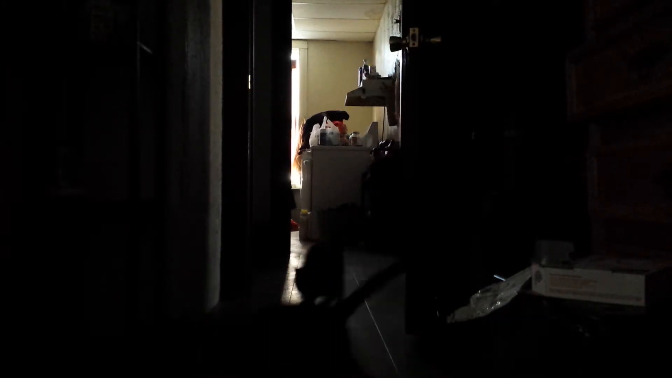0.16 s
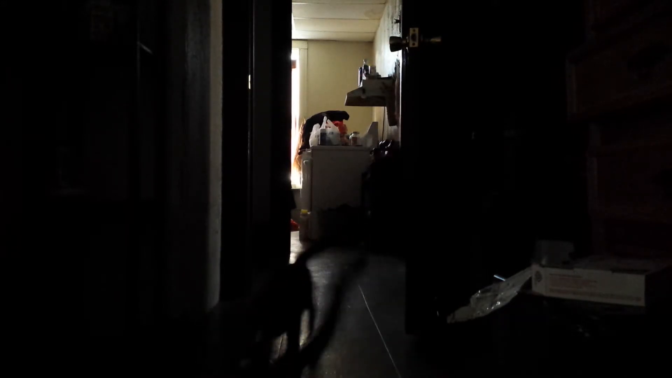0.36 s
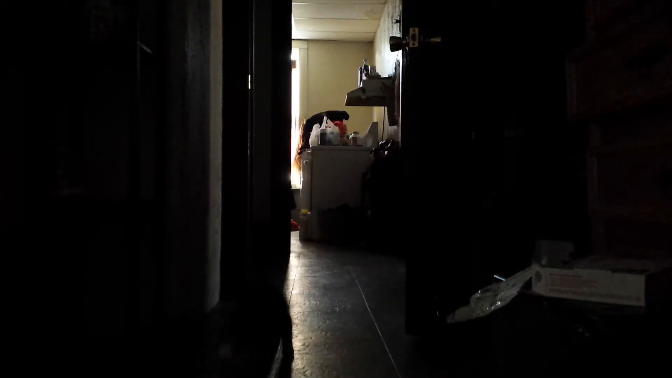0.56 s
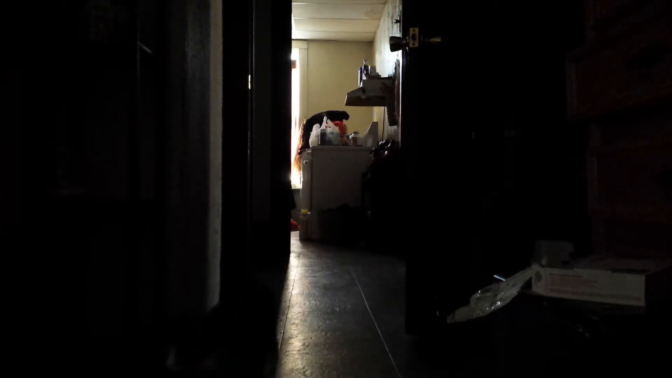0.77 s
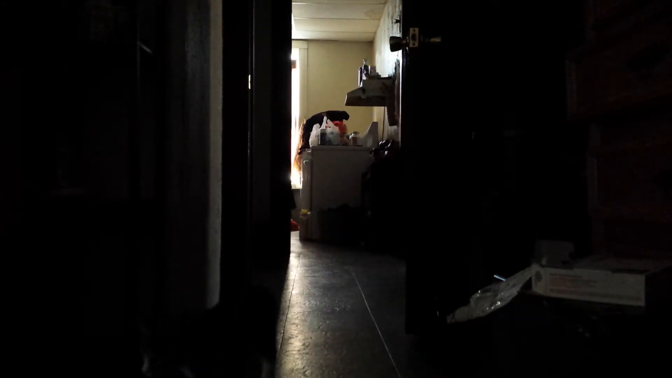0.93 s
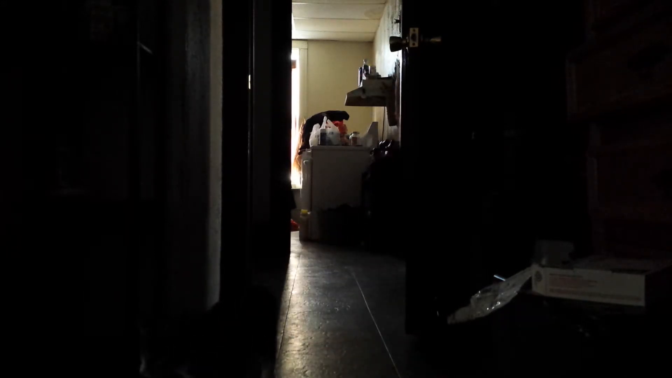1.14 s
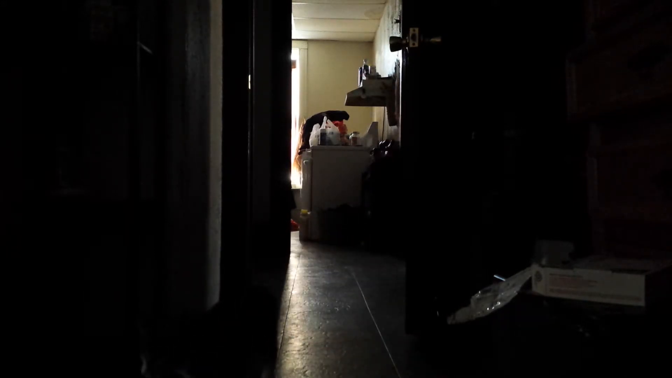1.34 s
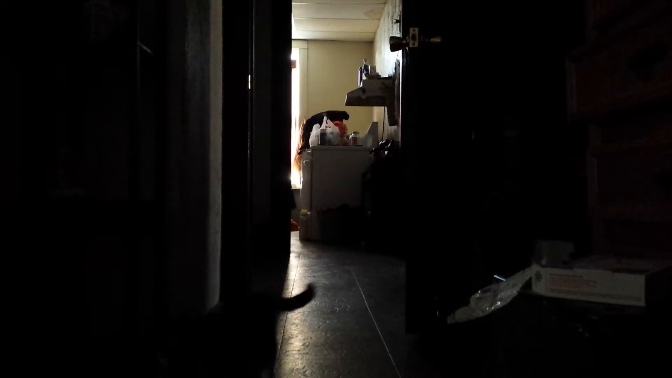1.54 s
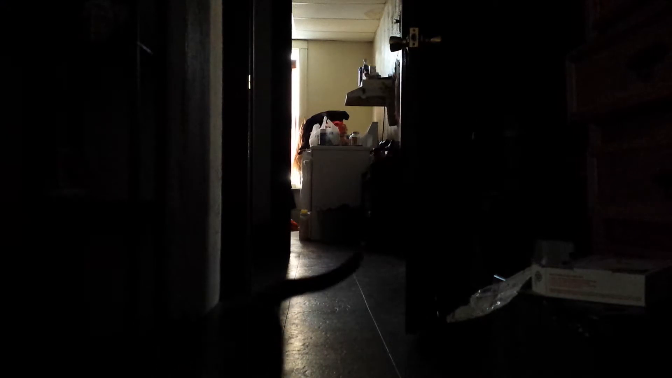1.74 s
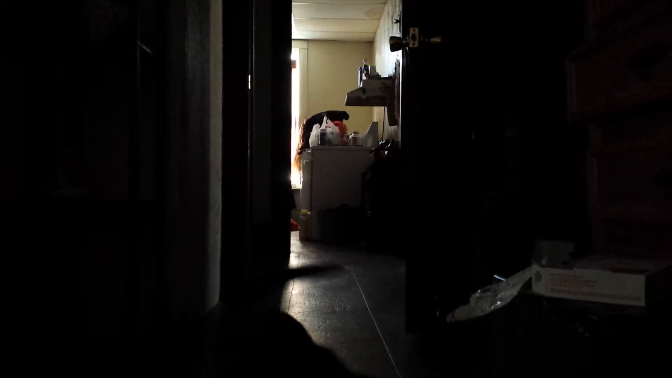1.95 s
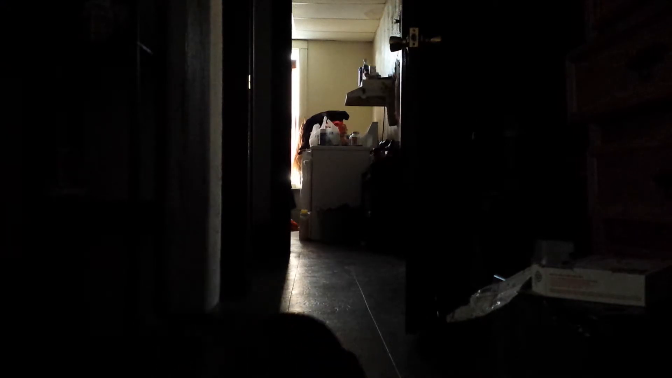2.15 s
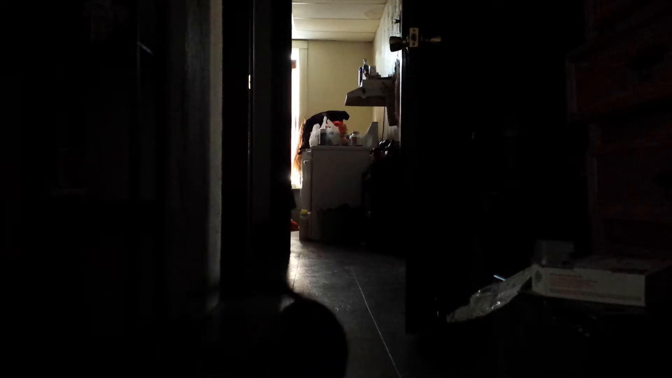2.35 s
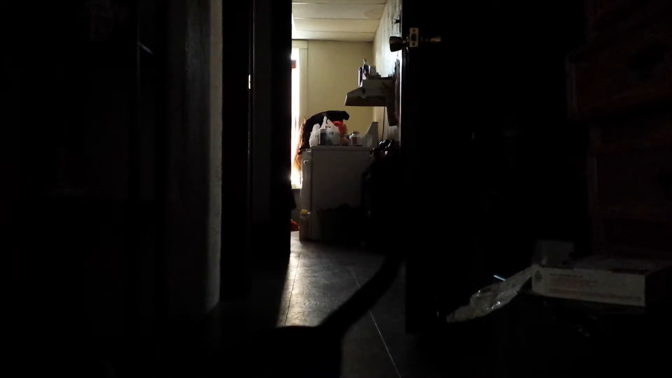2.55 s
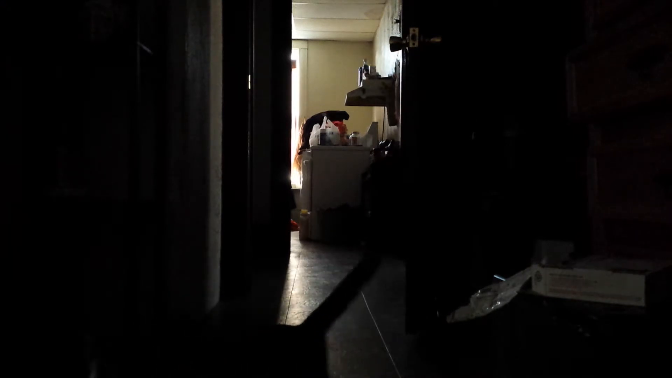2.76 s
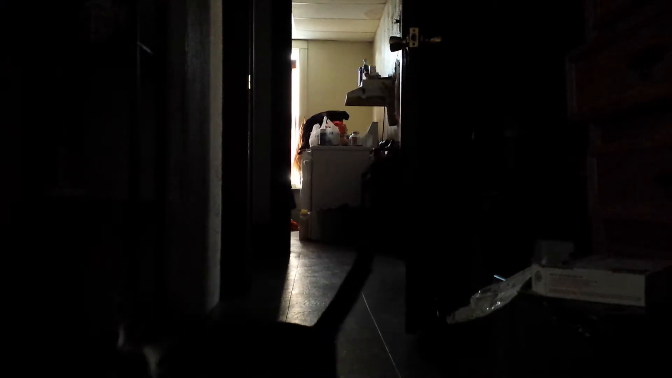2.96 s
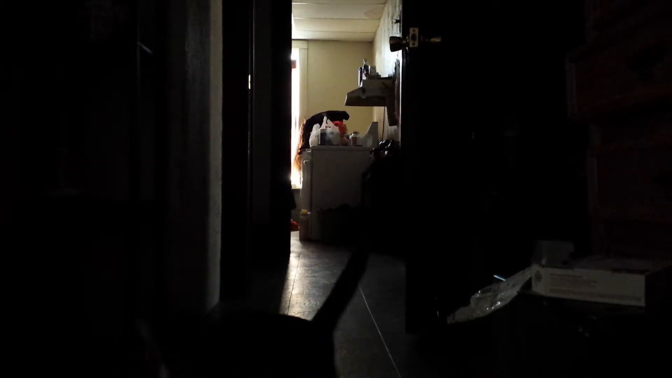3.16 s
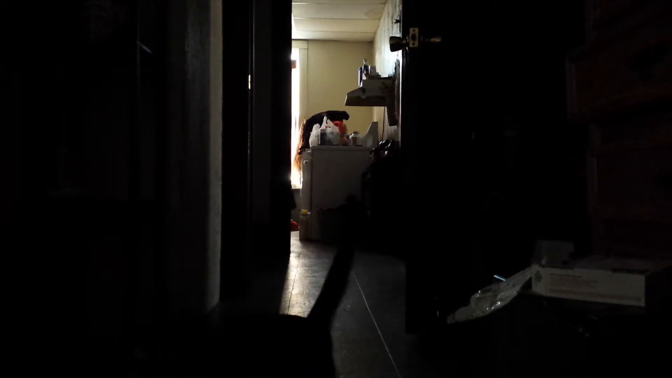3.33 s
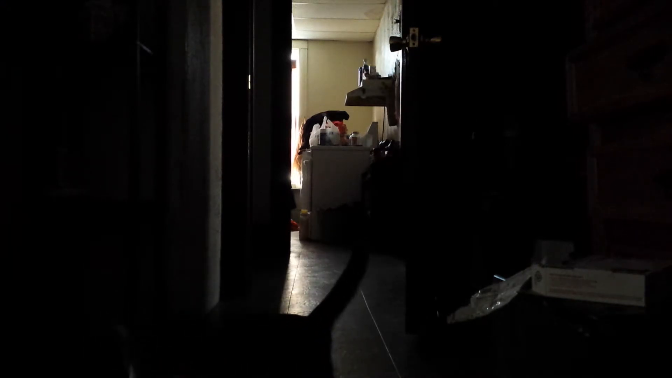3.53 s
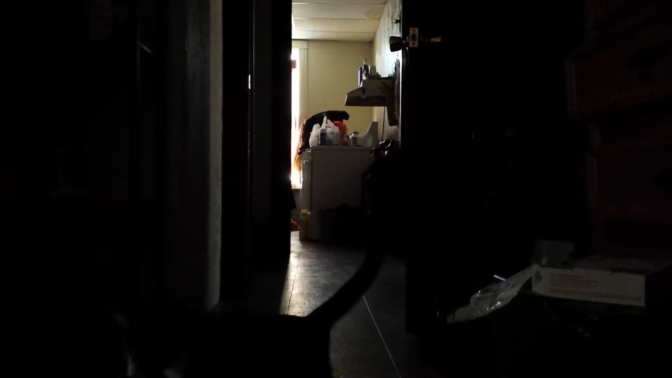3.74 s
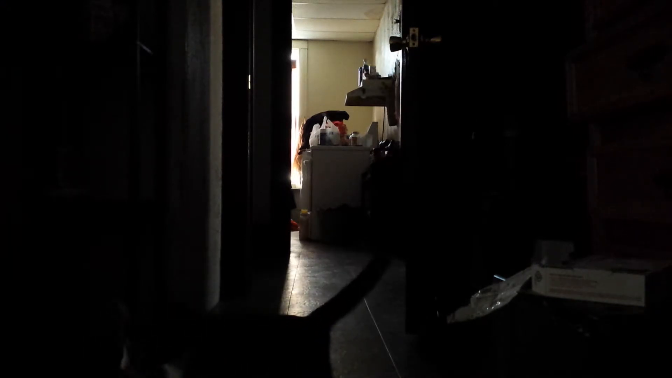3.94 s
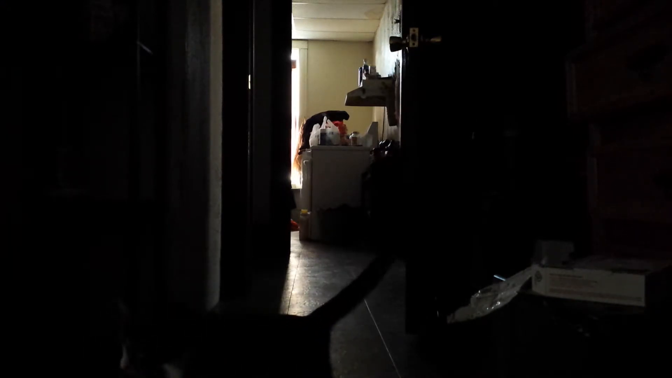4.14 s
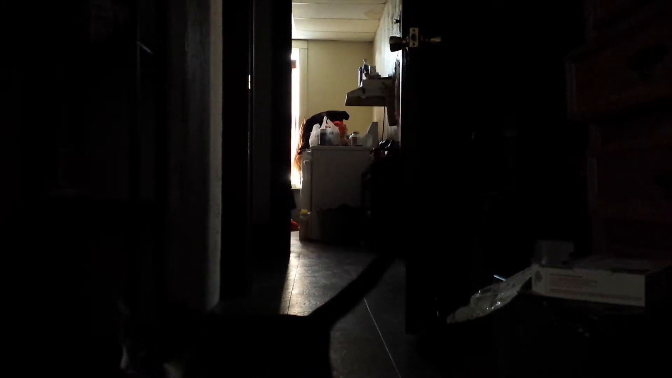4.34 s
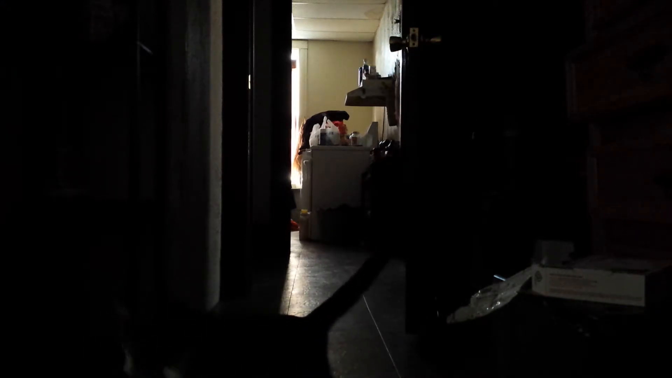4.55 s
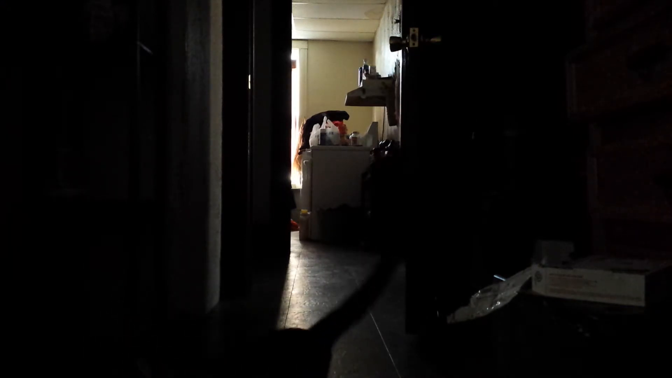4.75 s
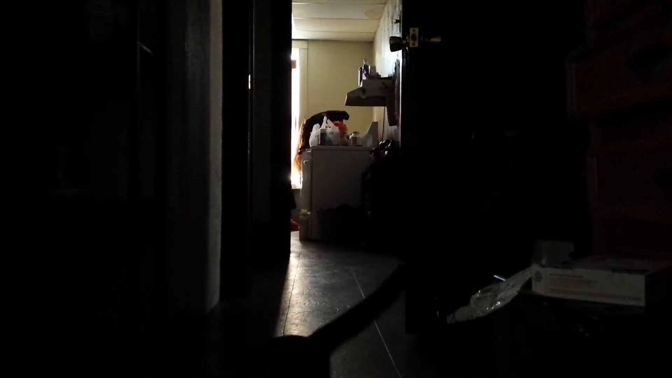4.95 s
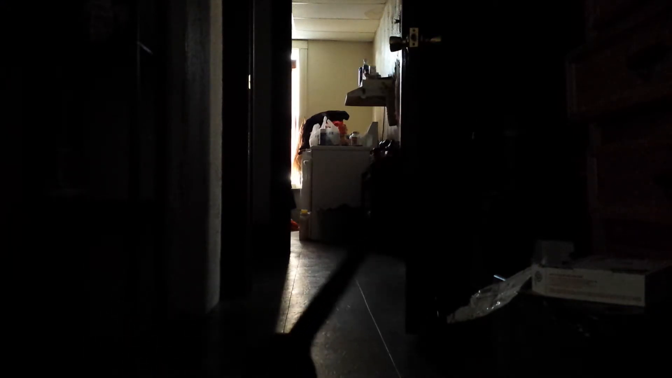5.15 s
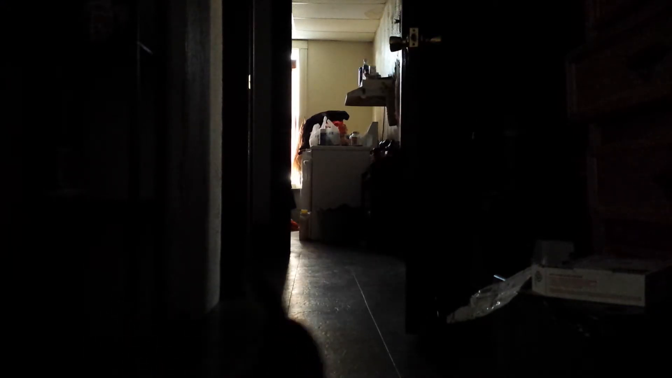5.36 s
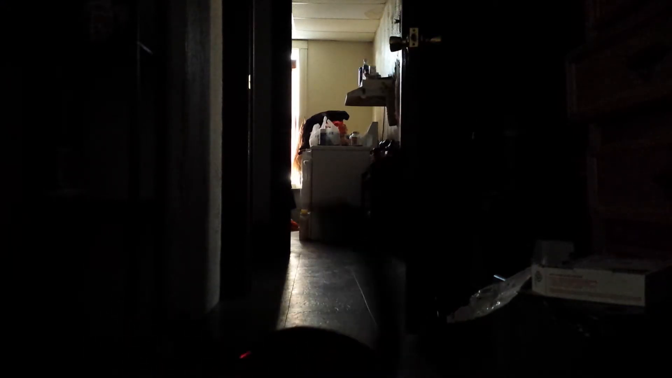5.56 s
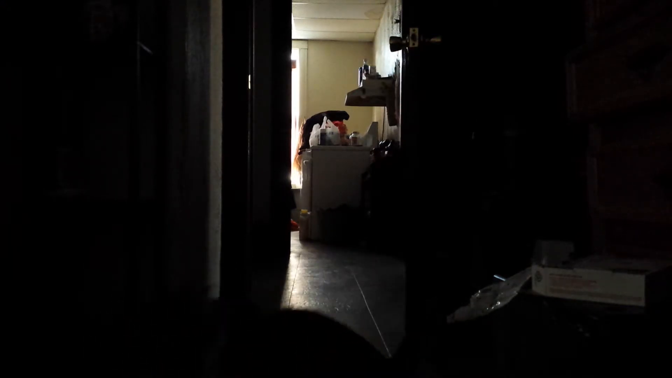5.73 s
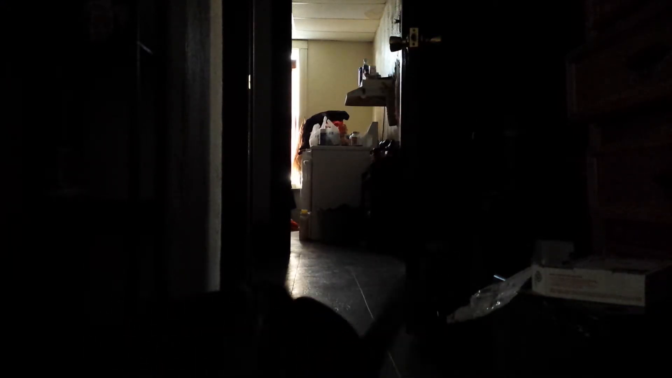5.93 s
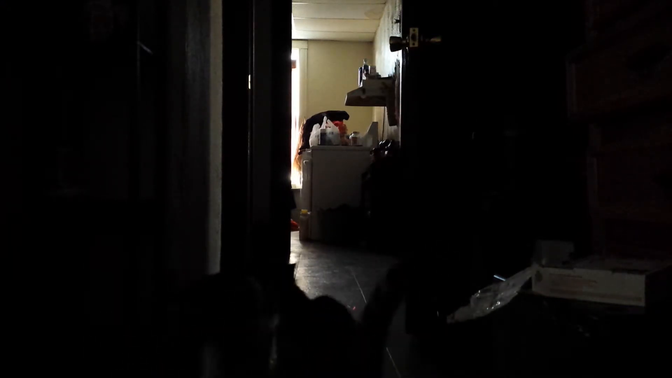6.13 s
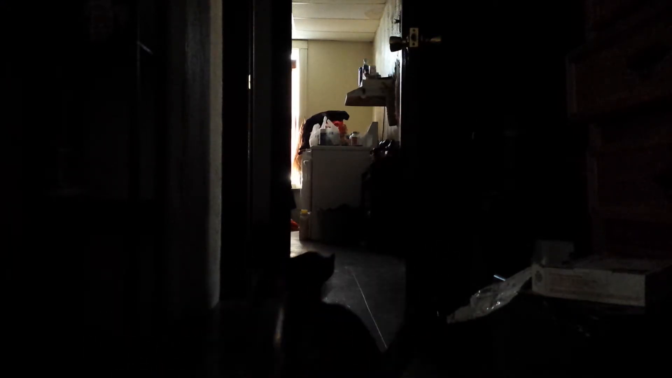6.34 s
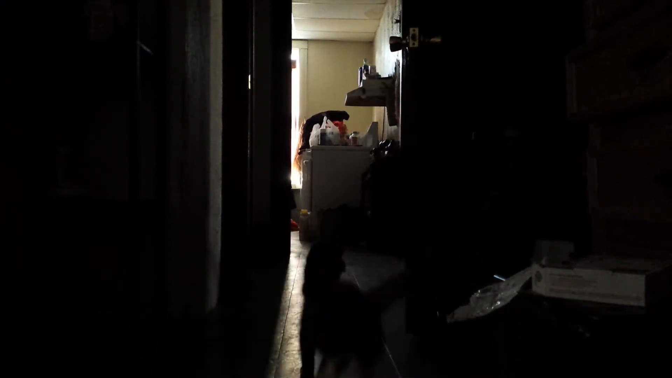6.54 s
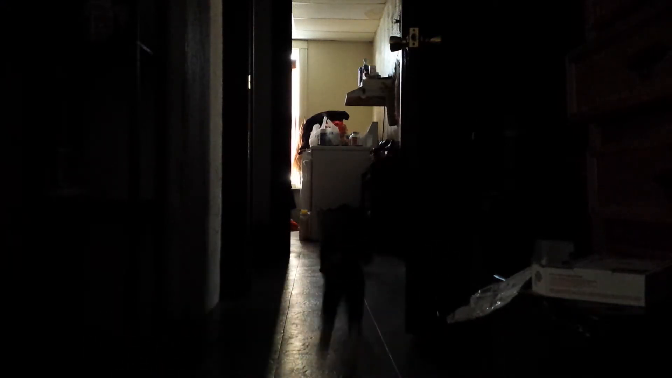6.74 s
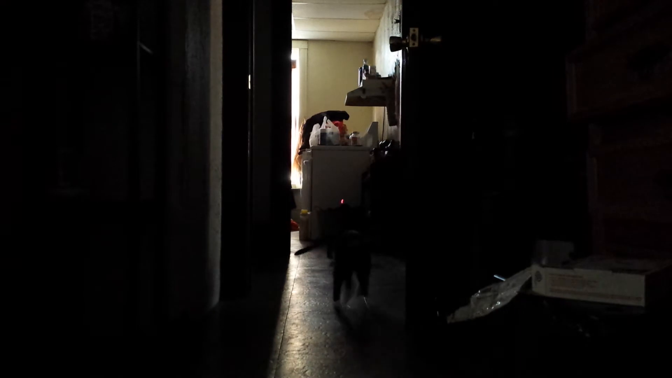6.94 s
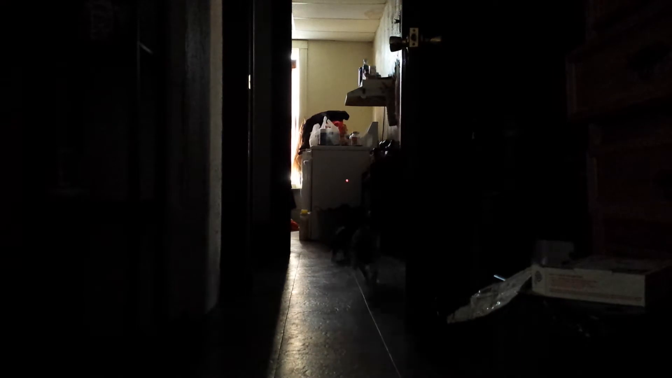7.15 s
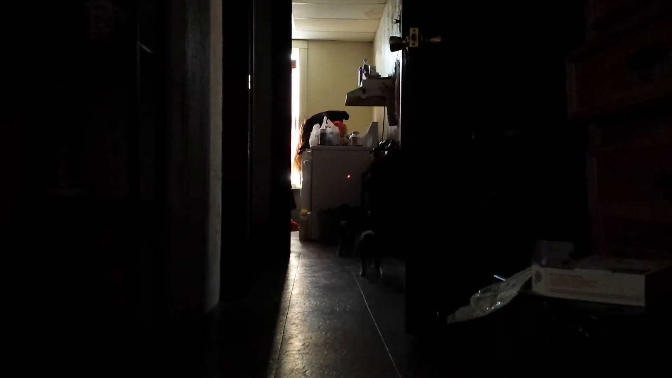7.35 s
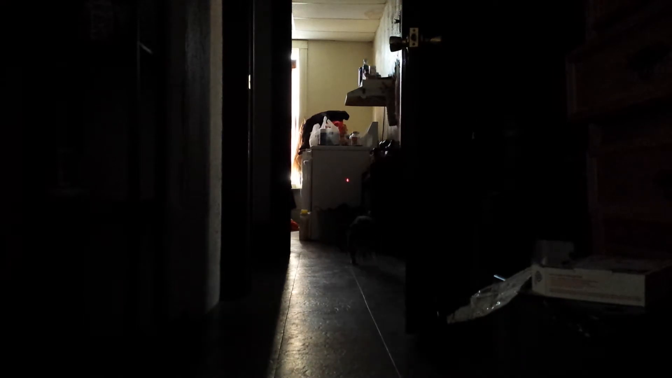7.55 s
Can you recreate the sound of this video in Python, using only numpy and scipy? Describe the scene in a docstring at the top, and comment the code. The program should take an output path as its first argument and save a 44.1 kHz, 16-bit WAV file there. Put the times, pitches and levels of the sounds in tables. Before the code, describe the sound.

A cat moves on a tiled floor in a narrow hallway, heard in close stereo. From 0 to 0.8 seconds it skitters: about ten quick padded landings, soft low thuds with a little slap, mixed with bright, very short claw clicks, loudest around 0.28 to 0.5, and scratchy stick-slip slides. It then goes quiet until about 1.3 seconds. From 1.5 to 3 seconds come softer, irregular paw thumps, with faint claw ticks, tiny scrapes and a light fur rustle. From 3 to 4.6 there is almost only the low, wavering rumble of the house and thin hiss. Between 4.8 and 5.6 several firmer pats land with faint scratches and rustling. From about 6.1 low muffled steps, firmest near 6.4, trot away, fading after 7.2. Landings set off a short, low hallway boom and a brief reverberant tail.

```python
"""Cat skittering in a tiled hallway

A cat skitters on the tiled floor of a narrow hallway, pounces about, then trots away.
Soft pads thud as short, low tones and set the hallway booming; claws crack and ring on the tiles.
Sliding paws scratch in tiny stick-slip jerks, the coat rustles, and a quiet house rumbles behind.
A camera close by hears it through two small ports, each with its own treble resonance."""
import sys
import numpy as np
from scipy import signal
from scipy.fft import rfft, irfft, next_fast_len
from scipy.io import wavfile
from scipy.ndimage import map_coordinates

SR = 44100
rng = np.random.default_rng(int(sys.argv[2]) if len(sys.argv) > 2 else 0)


def pcm_store(signal):
    """Save signal as 16-bit PCM."""
    levels = np.round(np.clip(np.atleast_2d(signal), -1, 1) * 32767)
    wavfile.write(sys.argv[1], SR, levels.astype(np.int16).T)


N = 334719  # length [samples]

# pads landing: (time [s], relative thud level [dB], relative slap level [dB], thud pitch [Hz])
PAD_LANDINGS = [(0.006, -31, -32, 356), (0.047, -28, -44, 191), (0.174, -30, -38, 128),
                (0.263, -32.5, -48, 148), (0.344, -33, -41, 129), (0.398, -29, -28.5, 331),
                (0.526, -31.5, -41, 190), (0.589, -34.5, -49, 288), (0.671, -27, -38.5, 257),
                (0.726, -30, -61, 190), (1.474, -36.5, -51.5, 199), (1.518, -33, -48, 240),
                (1.695, -35.5, -40, 128), (1.948, -43, -61.5, 155), (2.132, -36, -50.5, 202),
                (2.206, -32.5, -45.5, 128), (2.498, -38.5, -48, 153), (2.614, -44, -64, 199),
                (2.686, -36, -49.5, 190), (2.78, -36, -44, 277), (2.935, -29, -47, 279),
                (4.64, -46.5, -53.5, 201), (4.844, -31, -49, 164), (4.978, -31, -44.5, 191),
                (5.064, -29, -44.5, 143), (5.188, -30.5, -41.5, 450), (5.401, -37, -67, 130),
                (5.565, -38, -49, 191), (5.643, -45.5, -64.5, 133.6), (5.977, -46, -51.5, 164),
                (6.123, -40, -60, 172.3), (6.371, -30, -42, 126), (6.425, -36.5, -42.5, 135),
                (6.508, -40.5, -49.5, 142), (6.584, -38, -45, 132), (6.609, -34.5, -47, 135),
                (6.714, -35.5, -50, 132), (6.9, -44, -77, 132.5), (7.071, -38, -62.5, 132),
                (7.151, -42.5, -59, 132)]
# where the cat is: (time [s], offset [0 straight ahead to 1 far off to one side])
CAT_PATH = [(0, 0.43), (.2, .1), (.45, .3), (.48, 0.81), (.72, 0.83), (1.7, 0.92), (2.5, 0.779), (3, .9),
            (5.6, .85), (6.3, 0.23), (7.5, 0.078)]

# a flat, heavy landing thuds low and puts more of its weight into the hallway's boom
FLAT_HZ, FLAT_BOOM_DB, FLAT_FALLOFF = 132, 5.5, 8.2


def landings():
    """Paws land in pairs: a softer second paw follows each landing after a short, varying gap."""
    gap_s, gap_scatter_s = 0.032, 0.007
    second_thud_db, second_slap_db = -8.5, -10
    gaps = rng.normal(gap_s, gap_scatter_s, len(PAD_LANDINGS))
    steps = list(PAD_LANDINGS)
    for (s, thud, slap, hz), gap in zip(PAD_LANDINGS, gaps):
        steps.append((s + gap, thud + second_thud_db, slap + second_slap_db, hz))
    return steps


def flatness(thud_hz):
    """About 1 for a flat landing with a low thud, near 0 for a landing on the toes."""
    return (FLAT_HZ / thud_hz) ** FLAT_FALLOFF


def knock(t, hz, cycles):
    """A softly started tone that dies within a few cycles, like a well-damped bump."""
    soft_start = 1 - np.exp(-t * hz * 2)
    return -np.sin(2 * np.pi * hz * t) * fade(t, cycles / hz) * soft_start


def paws(steps, thud_db=2.0, slap_db=7, pat_db=3.5, pat_t60=0.046):
    """Each pad gives a low thud, a higher slap and a brief pat of noise."""
    # colour of the pat: (frequency [Hz], level [dB])
    pat_tone = [(120, -16), (290, 3), (420, 14), (560, -0.5), (780, 3.5), (1100, -4.5), (1700, -9.5),
                (3500, -15), (9000, -23)]
    slap_centre_hz, slap_scatter = 680, 0.086
    out, t = np.zeros((2, N)), np.arange(SR // 12) / SR
    for s, thud, slap, thud_hz in steps:
        slap_hz = slap_centre_hz * np.exp(slap_scatter * rng.standard_normal())
        thud_level = thud + thud_db - FLAT_BOOM_DB / 2 * flatness(thud_hz)
        low_thud = amp(thud_level) * knock(t, thud_hz, cycles=7)
        high_slap = amp(slap + slap_db) * knock(t, slap_hz, cycles=7)
        pat = unit(coloured(rng.standard_normal(len(t)), pat_tone)) * fade(t, pat_t60)
        add(out, s + 0.00066, low_thud + high_slap + amp(slap + pat_db) * pat)
    return out


def claws(crack_db=6, crack_t60=0.011, ring_db=5, ring_t60=0.013, ring_width=0.15):
    """A claw tip cracks on the tile and rings for an instant in a cluster of partials of its own."""
    # claw tips striking: (time [s], relative ring peak [dB], relative crack level [dB])
    strikes = [(0.186, -25, -51), (0.2826, -11.5, -23.5), (0.2998, -11, -43), (0.3049, -12.5, -44),
               (0.401, -12.5, -48), (0.4285, -33, -22), (0.4509, -16.5, -19.5), (0.4756, -16, -31.5),
               (0.4869, -15.5, -23), (0.5911, -33, -55), (0.6783, -14, -47), (1.335, -53.5, -71),
               (1.509, -40.5, -50), (1.5964, -44.5, -69), (1.6908, -25.5, -44), (1.7956, -41.5, -73),
               (2.1251, -40, -41.5), (2.4951, -43, -48), (2.7811, -46, -51), (2.8644, -49, -71),
               (2.9292, -41, -43), (2.9597, -35.5, -39), (4.5715, -63.5, -60.5), (4.64, -68, -66.5),
               (4.9122, -50.5, -43), (4.9564, -35, -68), (4.9804, -38.5, -46), (5.0923, -50, -44),
               (5.1928, -44, -59), (5.2033, -40, -32.5), (5.2704, -38, -57), (5.4852, -39, -56),
               (6.3717, -48, -57), (6.4545, -45.5, -39)]
    # colour of the crack: (frequency [Hz], level [dB])
    crack_tone = [(500, -18), (1500, 5), (3500, -2), (7000, 3.5), (15000, -7)]
    ring_centre_hz = 6596
    out, t = np.zeros((2, N)), np.arange(SR // 40) / SR
    for s, ring_peak, crack in strikes:
        snap = unit(coloured(rng.standard_normal(len(t)), crack_tone)) * fade(t, crack_t60)
        partials = ring_centre_hz * np.exp(ring_width * rng.standard_normal((14, 1)))
        phases = rng.random((14, 1))  # in turns
        ring = np.sin(2 * np.pi * (partials * t + phases)).sum(0) * fade(t, ring_t60)
        ring *= amp(ring_peak + ring_db) / np.abs(ring).max()
        placed_ring = panned(ring, treble_pan(s))
        placed_snap = panned(amp(crack + crack_db) * snap, treble_pan(s) / 2)
        add(out, s + 0.0008, placed_ring + placed_snap)
    return out


def slips(n, rate, spread_db):
    """Tiny contacts let go as impulses at random moments; a wider spread makes some much bigger."""
    extra = np.minimum(rng.exponential(size=n), 3)
    sizes = amp(spread_db * extra) * rng.choice([-1, 1], n)
    return unit(sizes * (rng.random(n) < rate / SR))


def slides(scratch_db=-4, rub_db=-10, smooth_share=0.35, judder_db=1.9):
    """Claws chatter over the grain of the tile while the pad rubs behind them, pressing unevenly."""
    # paws sliding: (time [s], length [s], relative level [dB])
    slide_events = [(0, 0.0071, -20), (0.187, 0.059, -28), (0.216, 0.098, -24.5), (0.329, 0.061, -35.5),
                    (.395, 0.07, -23), (0.443, 0.047, -25), (0.488, .03, -33), (0.594, 0.012, -43),
                    (0.673, 0.021, -37.5), (0.703, 0.036, -30), (0.767, 0.033, -43), (1.507, .036, -48.5),
                    (1.683, .024, -38.5), (1.956, 0.014, -54), (1.791, 0.0526, -50.5), (2.16, 0.046, -51),
                    (2.957, 0.036, -47.5), (3.136, 0.015, -54.5), (4.831, 0.052, -49), (4.96, 0.038, -46),
                    (5.22, 0.048, -53), (6.399, 0.033, -44.5), (6.59, 0.034, -53), (6.871, 0.029, -47)]
    # colour of the claws' scratch: (frequency [Hz], level [dB])
    scratch_tone = [(500, -33), (1500, -25), (3000, -19.5), (4500, 1), (6900, 10), (10000, -1),
                    (15000, -18.5)]
    # colour of the pad's rub: (frequency [Hz], level [dB])
    rub_tone = [(120, -11.5), (280, 0), (400, 4), (500, -7), (750, 0.5), (1200, -4), (1600, 2),
                (1900, -0.5), (2400, 1), (4200, 2), (7000, -10.5), (15000, -14.5)]
    # a slide takes hold over a share of its length, then lets go
    grip_share, release_s = 0.18, 0.0024
    out, t = np.zeros((2, N)), np.arange(SR // 5) / SR
    for s, length, db in slide_events:
        take_hold = 1 - np.exp(-t / (grip_share * length))
        let_go = np.exp(-np.maximum(t - length, 0) / release_s)
        pressure = amp(db + judder_db * wobble(len(t), 147.7)) * take_hold * let_go
        jerks = slips(len(t), rate=3200, spread_db=3.0)
        chatter = jerks + smooth_share * rng.standard_normal(len(t))
        scratch = amp(scratch_db) * unit(coloured(chatter, scratch_tone))
        rub = amp(rub_db) * unit(coloured(slips(len(t), rate=4000, spread_db=2), rub_tone))
        add(out, s, pressure * (panned(scratch, treble_pan(s + length / 2)) + rub))
    return out


def fur(fur_db=-2, flutter_db=3, pan_db=-1):
    """Thousands of tiny hair contacts a second make a soft rustle that swells and sinks."""
    # coat and legs brushing the floor: (time [s], relative level [dB])
    brushing = [(1.2, -72), (1.53, -67), (1.69, -59.5), (1.95, -69.5), (2.23, -67), (2.92, -56.5),
                (3.2, -77), (4.52, -81), (4.88, -63.5), (5.08, -52), (5.23, -82.5), (5.46, -57),
                (5.67, -70.5), (6.38, -67), (6.53, -60), (6.74, -62.5), (7.24, -70.5), (7.5, -76.5)]
    # colour of the rustle: (frequency [Hz], level [dB])
    rustle_tone = [(200, -11), (500, 8.5), (1200, 0), (2500, 2.5), (4500, 3), (7000, 8.5), (10000, 5),
                   (14000, 3)]
    hairs = unit(coloured(slips(N, rate=4980, spread_db=0.0), rustle_tone))
    level = curve(brushing) + fur_db + flutter_db * wobble(N, 30)
    return panned(amp(level) * hairs, pan_db)


def treble_pan(s):
    """Left-right level [dB] at time s: the camera's body shades the far port."""
    ahead_db, shade_db = 8, 16.5  # level straight ahead; what it loses at full offset
    return ahead_db - shade_db * np.interp(s, *np.transpose(CAT_PATH))


def panned(sound, pan_db):
    """A sound shared between the ports; above 0 dB the left one is louder."""
    return sound * amp([[pan_db / 2], [-pan_db / 2]])


def placed(pair):
    """Sound reaches the left port later the further the cat is off to one side."""
    full_lag_s = 0.0003  # at full offset
    lag = full_lag_s * SR * curve(CAT_PATH)
    return np.array([map_coordinates(pair[0], [np.arange(N) - lag]), pair[1]])


def booms(steps, boom_db=-16, rise_s=0.01, phase_spread=0.14):
    """Each main landing sets the hallway's air ringing, with the strengths and pitches varied at random."""
    # resonances of the air between the walls: (frequency [Hz], relative level [dB], 60 dB decay [s])
    hall_modes = [(58, -14.5, 0.33), (75.16, -6.5, 0.29), (98.1, -4, 0.18), (106, 2.5, .26),
                  (125.1, -2.5, 0.19), (143, -4.5, .2), (188.8, -5.5, .2), (289, -9.5, 0.18)]
    out, t = np.zeros((2, N)), np.arange(SR // 4) / SR
    hz, db, t60 = np.transpose(hall_modes)
    decays = fade(t, t60[:, None]) * (1 - np.exp(-t / rise_s))
    for s, thud, _, thud_hz in steps:
        boom = thud + FLAT_BOOM_DB / 2 * flatness(thud_hz)
        strength = amp(db + rng.normal(0, 3, len(hz)))
        mode_hz = hz * (1 + rng.normal(0, 0.02, len(hz)))
        # slightly different phases at the two ports
        at_ports = strength * np.exp(1j * rng.normal(0, phase_spread, (2, len(hz))))
        ring = (at_ports @ (decays * np.exp(2j * np.pi * mode_hz[:, None] * t))).imag
        add(out, s + 0.00061, -amp(boom + boom_db) * ring / ring[:, :SR // 20].std())
    return out


def echoes(sound, build_s=0.0049, near_db=2, near_t60=0.046, count=40):
    """Quick scatter off the nearest wall and the hallway's tail, new for each stretch of time."""
    # how long the hallway rings: (frequency [Hz], 60 dB decay [s])
    hall_t60 = [(100, 0.58), (400, 0.41), (1500, 0.29), (7000, 0.26), (14000, 0.3)]
    n, step = SR // 4, N // count + 1
    hz, t, z = signal.stft(diffuse(count * n).reshape(2, count, n), SR, nperseg=256)
    hallway = fade(t, along(hall_t60, hz)[:, None]) * (1 - np.exp(-t / build_s))
    near_wall = amp(near_db) * fade(t, near_t60)
    tails = signal.istft(z * (hallway + near_wall), SR, nperseg=256)[1]
    out = np.zeros((2, N))
    for k in range(count):
        tail = tails[:, k] / np.linalg.norm(tails[0, k])
        stretch = sound[None, k * step:(k + 1) * step]
        add(out, k * step / SR, signal.fftconvolve(stretch, tail, axes=1))
    return out


def house(rumble_db=-66, air_db=-83, waver_db=2.5):
    """The low, slightly wavering rumble of a quiet house, with a little air noise on top."""
    # colour of the rumble: (frequency [Hz], level [dB])
    rumble_tone = [(13, -61), (22, -22), (32, -13.5), (42, -7.5), (86, 0), (129, 1.5), (204, -13.5),
                   (306, -20.5), (367, -20), (694, -32), (890, -33), (3180, -37.5), (4460, -38.5),
                   (5000, -39), (6500, -63), (11000, -120)]
    rumble = unit(filtered(diffuse(N), lambda hz: amp(along(rumble_tone, hz))))
    return amp(rumble_db + waver_db * wobble(N, 7)) * rumble + amp(air_db) * diffuse(N)


def diffuse(n):
    """Noise from all sides: more alike at both ports in the low range, unrelated in the treble."""
    # likeness of the two ports: (frequency [Hz], likeness [0 to 1])
    alike = [(100, 0.54), (300, 0.99), (700, 1), (1500, .6), (3000, 0.0074)]
    m = next_fast_len(n, True)
    turn = np.arccos(np.clip(along(alike, np.fft.rfftfreq(m, 1 / SR)), -1, 1)) / 2
    mid, side = irfft(rfft(rng.standard_normal((2, m))) * [np.cos(turn), np.sin(turn)], m)[:, :n]
    return np.array([mid + side, mid - side])


def amp(db):
    """Decibels to gain."""
    return 10 ** (np.asarray(db) / 20)


def unit(x):
    """x scaled to an rms of 1."""
    return x / np.sqrt(np.mean(x ** 2) + 1e-20)


def fade(t, t60):
    """A decay of 60 dB in t60 seconds."""
    return np.exp(-np.log(1000) * t / t60)


def wobble(n, rate):
    """A smooth random curve with rate knots a second."""
    knots = rng.standard_normal(int(n * rate / SR) + 4)
    return map_coordinates(knots, [np.arange(n) * rate / SR])


def curve(points):
    """(time, value) points joined by straight lines, one value per sample."""
    return np.interp(np.arange(N) / SR, *np.transpose(points))


def along(points, hz):
    """(frequency, value) points read on a log frequency axis."""
    f, v = np.transpose(points)
    return np.interp(np.log(hz + 1), np.log(f + 1), v)


def filtered(x, response):
    """x with each frequency scaled by response(hz)."""
    m = next_fast_len(N + 8192, True)
    return irfft(rfft(x, m) * response(np.fft.rfftfreq(m, 1 / SR)), m)[..., :N]


def coloured(x, points, size=512):
    """x through a filter of this colour that never sounds ahead of its input (minimum phase)."""
    cepstrum = irfft(np.log(amp(along(points, np.fft.rfftfreq(size, 1 / SR)))))
    # folding the cepstrum onto its first half gives the minimum phase
    cepstrum[1:size // 2] *= 2
    cepstrum[size // 2 + 1:] = 0
    impulse = irfft(np.exp(rfft(cepstrum)))
    m = next_fast_len(len(x) + size, True)
    return irfft(rfft(x, m) * rfft(impulse, m), m)[:len(x)]


def add(track, s, sound):
    """Mix a sound into the track at time s."""
    start = max(round(s * SR), 0)
    track[:, start:start + sound.shape[-1]] += sound[..., :N - start]


def scene(paw_wet_db=-7, claw_wet_db=-3, slide_wet_db=-1):
    """The cat, the hallway's answer and the quiet house around them."""
    pads = paws(landings())
    clicks = claws()
    scrapes = slides() + fur()
    send = amp(paw_wet_db) * pads + amp(claw_wet_db) * clicks + amp(slide_wet_db) * scrapes
    cat = placed(pads + clicks + scrapes)
    return cat + echoes(send.mean(0)) + booms(PAD_LANDINGS) + house()


def record(dry, hiss_db=-76, low_cut_hz=42, top_hz=14700):
    """Port resonances, bass cut, amplifier hiss and the band limit."""
    # treble resonance of the left port: (frequency [Hz], level [dB])
    left_port = [(100, 3), (3000, 1), (5400, 3), (6300, -0.5), (7000, -0.5), (8200, -4), (10500, -5.5),
                 (12500, -11), (15000, -20.5)]
    # treble resonance of the right port: (frequency [Hz], level [dB])
    right_port = [(100, 1.12), (3000, 0.34), (5600, 0), (7000, 3.5), (7900, 4.5), (8900, 0), (10500, -1.5),
                  (12500, -3), (15000, -23)]
    heard = np.array([coloured(dry[0], left_port), coloured(dry[1], right_port)])
    bass_cut = signal.butter(2, low_cut_hz, "highpass", fs=SR, output="sos")
    heard = signal.sosfilt(bass_cut, heard)
    heard = heard + amp(hiss_db) * rng.standard_normal((2, N))
    return filtered(heard, lambda hz: hz < top_hz)


dry = scene()
out = record(dry)
pcm_store(out)
```